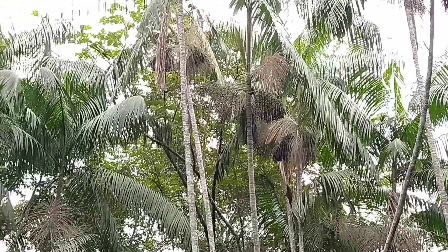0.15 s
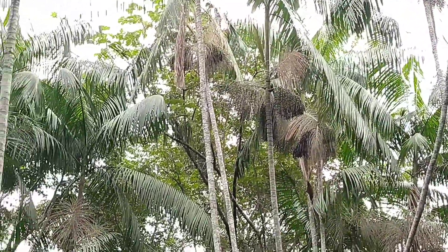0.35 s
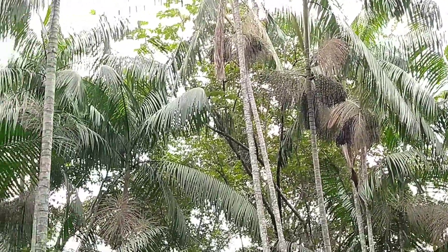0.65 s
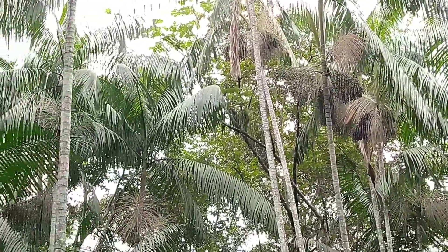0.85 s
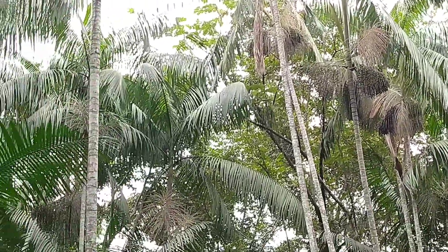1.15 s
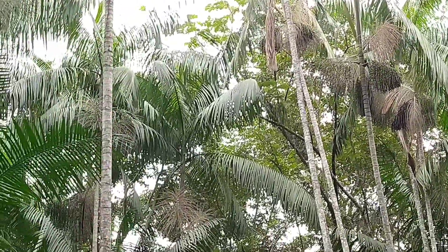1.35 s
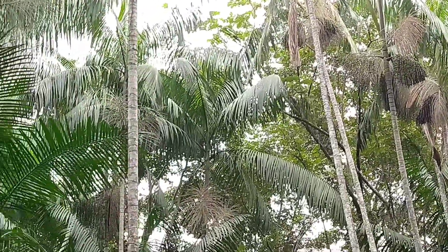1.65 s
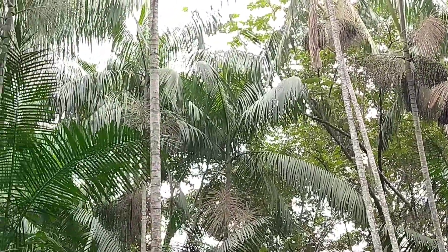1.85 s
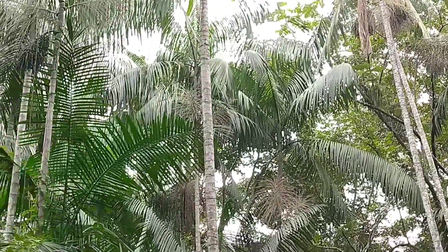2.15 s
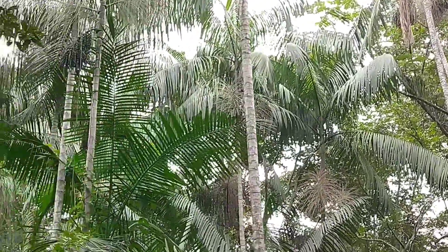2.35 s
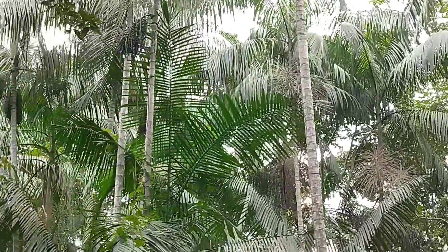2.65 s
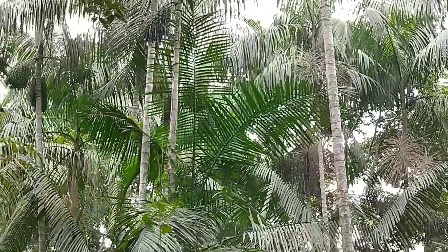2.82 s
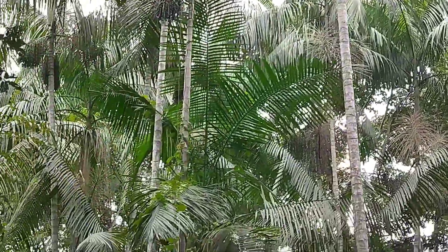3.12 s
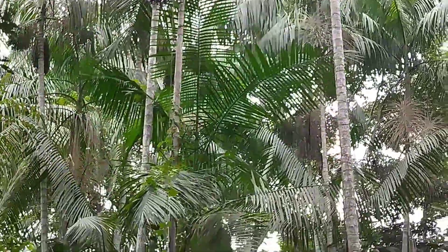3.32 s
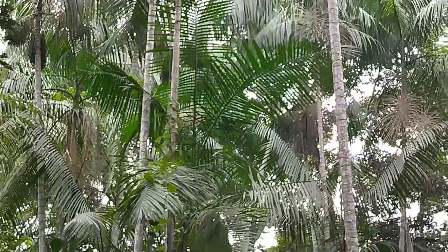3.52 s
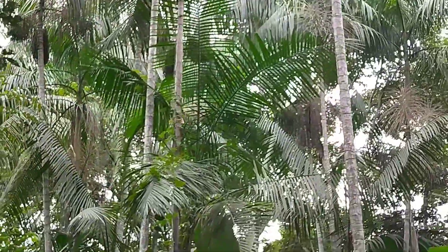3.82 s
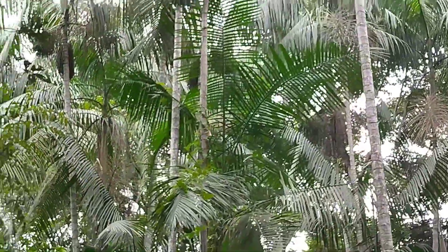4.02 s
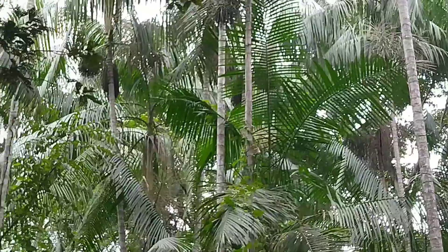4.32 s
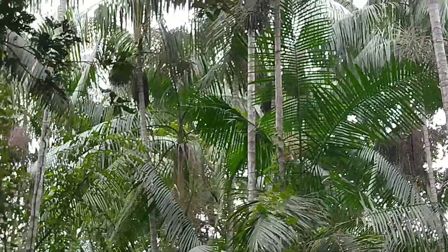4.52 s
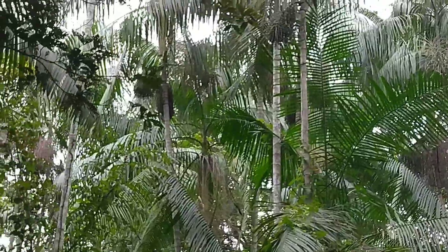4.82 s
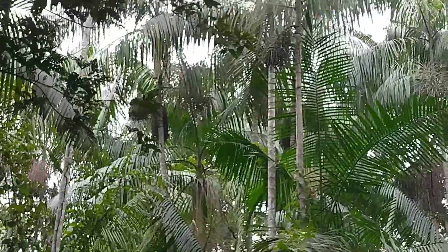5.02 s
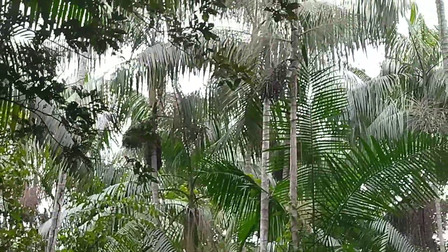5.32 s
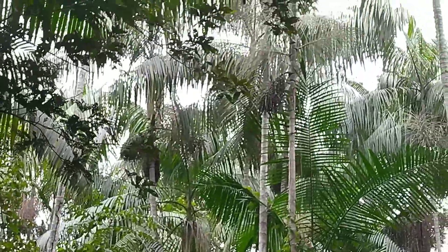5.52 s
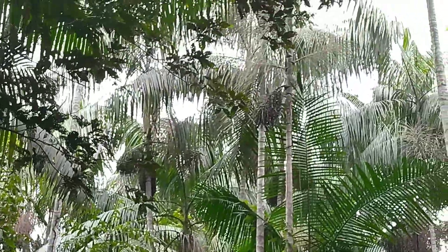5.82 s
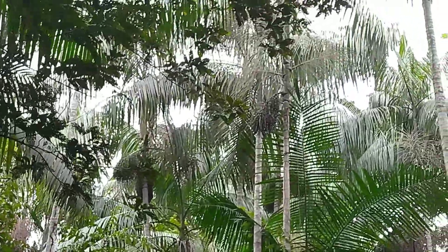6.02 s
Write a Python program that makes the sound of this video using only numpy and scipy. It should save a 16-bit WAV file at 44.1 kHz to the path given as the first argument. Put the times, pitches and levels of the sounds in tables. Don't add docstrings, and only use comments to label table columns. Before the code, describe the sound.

Outdoors among tall palms, massed insects hold a bright, unbroken, slightly flickering drone that grows gradually stronger. Behind it, faint far parrot rasps and tiny hoarse whistles scatter through the first few seconds, mostly fall silent, and return with a quick rising two-part chirp, repeated more softly. Short reflections from trunks blur the notes. Low air rumble and water murmur stay faint; the small microphone's two sides sound differently coloured.

```python
import sys
import numpy as np
from scipy import signal
from scipy.fft import rfft, irfft, dct, next_fast_len
from scipy.io import wavfile

SR = 44100
rng = np.random.default_rng(int(sys.argv[2]) if len(sys.argv) > 2 else 0)


def volts_from_decibels(level):
    exponent = np.asarray(level, float) / 20
    return 10 ** exponent


def master_out(mix):
    frames = np.transpose(np.atleast_2d(mix))
    ceiling = np.clip(frames, -1, 1)
    pcm = np.round(ceiling * 32767).astype(np.int16)
    wavfile.write(sys.argv[1], SR, pcm)


N = 271656


def rms_one(x):
    return x / np.sqrt(np.mean(x ** 2) + 1e-20)


def in_time(rows):
    t_s, level_db = np.transpose(rows)
    return np.interp(np.arange(N) / SR, t_s, level_db)


def at_hz(points, hz):
    point_hz, value = np.transpose(points)
    return np.interp(np.log(hz + 1), np.log(point_hz), value)


def drift(rate_hz):
    r = np.exp(-2 * np.pi * rate_hz * 40 / SR)
    slow = signal.lfilter([1], [1, -2 * r, r * r], rng.standard_normal(N // 40 + 2002))
    slow = rms_one(slow[2000:])
    return np.interp(np.arange(N) / 40, np.arange(len(slow)), slow)


def resonate(x, hz, width_hz):
    r = np.exp(-np.pi * width_hz / SR)
    gain = (1 - r * r) / 2
    section = [gain, 0, -gain, 1, -2 * r * np.cos(2 * np.pi * hz / SR), r * r]
    return signal.sosfilt([section, section], x)


def voices(modes, drive, patchy_db):
    out = np.zeros((2, N))
    for hz, width_hz, left_db, right_db in modes:
        left_waver = drift(2.9) + drift(42)
        right_waver = drift(4.4) + drift(16.0)
        waver = volts_from_decibels(patchy_db * np.array([left_waver, right_waver]))
        port_gain = volts_from_decibels(np.array([[left_db], [right_db]]))
        out += port_gain * waver * resonate(drive(), hz, width_hz)
    return rms_one(out)


def pulsed(hz, jitter, sharpness):
    phase = 2 * np.pi * np.cumsum(hz * (1 + jitter * drift(22))) / SR
    return rng.standard_normal((2, N)) * np.exp(sharpness * np.cos(phase))


def tymbal_clicks(per_s):
    return rng.standard_normal((2, N)) * (rng.random((2, N)) < per_s / SR)


def cicadas():
    # f/Hz, width/Hz, left/dB, right/dB
    low_modes = [(3190, 700, -9, -13.5), (3603, 840, -2.5, -4), (4797, 1600, -1.5, 0.5),
                 (5690, 1870, -6, -6), (6895, 1970, -9, 0.5), (8890, 2200, -22.5, -4)]
    high_modes = [(9250, 2100, 0, 5.5), (10320, 2300, -5.5, -4), (11150, 2400, 7, -5),
                  (12240, 4500, -11.5, -9), (14260, 1800, -13.5, -8)]
    near_modes = [(12600, 1500, -3, -12), (13600, 800, -8, -14)]
    # t/s, level/dB
    low_effort = [(0.0, -36), (0.24, -37), (1.08, -35), (1.55, -34.2), (2.43, -36), (2.5, -34),
                  (4.25, -34.5), (4.89, -32.5), (5.0, -33), (6.16, -32)]
    # t/s, level/dB
    high_effort = [(0.0, -41.5), (1.08, -39.5), (2.25, -38.7), (2.47, -42), (2.76, -37.5), (4.08, -37.5),
                   (4.19, -39.5), (4.89, -38), (5.2, -39.5), (6.16, -35.5)]
    # t/s, lift/dB
    swells = [
        (1.59, 6.5),
        (3.72, 4.5),
        (6.07, 3),
    ]
    rise_s, fall_s = 0.27, 0.09

    t = np.arange(N) / SR
    low_db = in_time(low_effort)
    high_db = in_time(high_effort)
    for crest_s, lift_db in swells:
        high_db = high_db + lift_db * np.interp(t, [crest_s - rise_s, crest_s, crest_s + fall_s], [0, 1, 0])

    clicks = lambda: tymbal_clicks(per_s=22000)
    buzz = lambda: pulsed(154.5, jitter=0.004, sharpness=1.2)
    low = voices(low_modes, clicks, patchy_db=0.64)
    high = voices(high_modes, clicks, patchy_db=0.54)
    near = voices(near_modes, buzz, patchy_db=0.8)
    chorus = volts_from_decibels(low_db + 4) * low + volts_from_decibels(high_db + 4) * (high + volts_from_decibels(-12) * near)
    edge = signal.butter(6, 3084, "high", fs=SR, output="sos")
    return signal.sosfilt(edge, chorus)


def sung_twice(rows):
    # t/s, lift/dB, tempo stretch
    starts = [
        (4.589, -5, 1.0),
        (4.924, -6, 0.98),
    ]
    return [(start_s + stretch * s, *rest, db + lift_db)
            for start_s, lift_db, stretch in starts for s, *rest, db in rows]


def bursts(rows):
    rise_db_per_s, fall_db_per_s = 482, 232
    t = np.arange(N) / SR
    gain = np.zeros(N)
    for s, hold_s, level_db in rows:
        before_s = np.maximum(s - t, 0)
        after_s = np.maximum(t - s - hold_s, 0)
        gain += volts_from_decibels(level_db - rise_db_per_s * before_s - fall_db_per_s * after_s)
    return gain


def rasps():
    # f/Hz, width/Hz, left/dB, right/dB
    flock_throat = [(1500, 690, -3.5, -7.5), (2000, 610, -3.5, 1.5), (2410, 770, 0, 3)]
    upper_throat = [(2054, 170, -1, 4), (2260, 130, 6, 1), (2890, 420, 4, 4.5)]
    lower_throat = [(1520, 520, 0, 0.0046)]
    # t/s, hold/s, level/dB
    flock_rasps = [(0.0, 0.047, -53.5), (.14, .03, -55), (.35, 0.012, -54.5), (.44, .13, -58.5),
                   (.68, .05, -53), (.86, 0.17, -55), (1.1, 0.066, -52), (1.25, .1, -53.5),
                   (1.42, 0.082, -50.5), (1.63, 0.11, -53.5), (2.16, 0.11, -61)]
    upper_rasps = [(2.462, 0.0092, -52.5), (2.525, 0.008, -50), (2.59, 0.18, -52), (3.98, 0.24, -62.5),
                   (4.297, 0.012, -54.5), (4.492, 0.085, -50.5), (4.622, .015, -43.5), (4.798, 0.026, -46),
                   (4.867, 0.032, -50), (4.974, .04, -49), (5.155, 0.14, -52)]
    lower_rasps = [
        (2.41, 0.0089, -60),
        (2.536, 0.011, -52),
        (2.737, .01, -64),
        (4.016, .03, -61),
        (4.767, 0.0078, -55.5),
        (4.87, .01, -56),
        (5.12, 0.15, -60),
    ]
    # t after start/s, hold/s, level/dB
    phrase_rasps = [
        (.012, .006, -44),
        (.066, .008, -44),
    ]

    rough = lambda: pulsed(310, jitter=0.12, sharpness=1.0)
    layers = [(flock_throat, flock_rasps, 2.5),
              (upper_throat, upper_rasps, 2.5),
              (lower_throat, [*lower_rasps, *sung_twice(phrase_rasps)], -2.5)]
    out = np.zeros((2, N))
    for throat, calls, trim_db in layers:
        out += volts_from_decibels(trim_db) * bursts(calls) * voices(throat, rough, patchy_db=3.5)
    return out


def pipes():
    # t/s, length/s, f/Hz, level/dB
    single_pipes = [
        (.16, 0.028, 1530, -71),
        (.47, .03, 1500, -59.5),
        (.555, 0.027, 1580, -60.5),
        (.865, 0.015, 1640, -59),
        (1.25, .033, 1520, -75),
        (1.315, 0.018, 1500, -61),
        (2.426, 0.031, 1450, -60.5),
        (2.505, 0.06, 1176, -76),
        (2.535, .025, 1560, -61),
        (2.735, 0.02, 1535, -63.5),
    ]
    # t/s, length/s, f of first partial/Hz, level/dB
    single_squeaks = [(2.435, .025, 1420, -75), (2.455, 0.031, 1143, -65), (2.485, 0.021, 1463, -61),
                      (2.505, 0.042, 1160, -76), (2.64, 0.089, 1075, -76), (2.68, 0.065, 1480, -70.5),
                      (4.47, 0.12, 1100, -79), (4.565, 0.03, 973, -75), (4.62, 0.02, 1270, -71),
                      (4.69, 0.039, 1178, -74), (4.895, 0.021, 993, -68), (4.98, 0.017, 1080, -79),
                      (5.025, 0.049, 1162, -74), (5.2, 0.084, 1139, -75), (5.26, 0.027, 1003, -76.5)]
    # t after start/s, length/s, start f/Hz, end f/Hz, level/dB
    phrase_pipes = [
        (0.0, 0.032, 1400, 1484, -54),
        (.055, 0.033, 1500, 1710, -49),
        (.1, .038, 1190, 1160, -54),
    ]
    phrase_squeaks = [
        (.075, 0.046, 1650, 1600, -73.5),
        (.135, .024, 1100, 1010, -67.5),
    ]

    steady = lambda rows: [(s, length_s, hz, hz, db) for s, length_s, hz, db in rows]
    kinds = [(steady(single_pipes) + sung_twice(phrase_pipes), 2.5),
             (steady(single_squeaks) + sung_twice(phrase_squeaks), 21.5)]
    wobble = 1 + 0.0085 * drift(36)
    hoarse = volts_from_decibels(3.8 * drift(49))
    out = np.zeros(N)
    for notes, second_db in kinds:
        for s, length_s, start_hz, end_hz, level_db in notes:
            size, at = round(length_s * SR), round(s * SR)
            hz = np.linspace(start_hz, end_hz, size) * wobble[at:at + size]
            phase = 2 * np.pi * np.cumsum(hz) / SR
            upper = np.sin(2 * phase) + volts_from_decibels(-6) * np.sin(3 * phase)
            tone = np.sin(phase) + volts_from_decibels(second_db) * upper
            out[at:at + size] += volts_from_decibels(level_db + 11) * tone * np.hanning(size) ** 0.6
    return out * hoarse


def trunks(x):
    t60_s, gap_s = 0.31, 0.004
    t = np.arange(SR // 2) / SR
    tail = rng.standard_normal((2, len(t))) * volts_from_decibels(-60 * t / t60_s) * (t > gap_s)
    tail /= np.sqrt(np.sum(tail ** 2, axis=1, keepdims=True))
    return signal.fftconvolve(x[None], tail, axes=1)[:, :N]


def air():
    # f/Hz, level/dB per Hz
    murmur_spectrum = [(15, -29), (25, -1.5), (32, -2.5), (84, -2), (122, -14), (164, -10), (216, -10.5),
                       (262, -9.5), (404, -14.5), (542, -11), (646, -15.5), (1280, -15), (2180, -9.5),
                       (2700, -5.5), (3510, -43.5), (5940, -120)]
    # f/Hz, correlation/1
    likeness = [(60, 0.32), (150, 0.19), (380, 0.52), (950, 0.39), (2380, -0.17), (5980, -0.018),
                (15000, -0.01)]
    size = next_fast_len(N)
    hz = np.arange(size // 2 + 1) * SR / size
    mid, side = rfft(rng.standard_normal((2, size))) * volts_from_decibels(at_hz(murmur_spectrum, hz))
    alike = np.clip(at_hz(likeness, hz), -1, 1)
    both = np.sqrt(1 + alike) * mid + np.sqrt(1 - alike) * side * [[1], [-1]]
    murmur = rms_one(irfft(both, size)[:, :N])
    rumble = signal.sosfilt(signal.butter(2, 140, fs=SR, output="sos"), murmur)
    lumps = volts_from_decibels(2.0 * drift(2.7) - 1.0)
    return volts_from_decibels(-58.5) * (murmur + (lumps - 1) * rumble)


def frame_rounded(x):
    # f/Hz, step/dB
    step_spectrum = [(6300, -60), (7000, -29), (8200, -27.5), (9400, -29), (9800, -50), (10600, -50),
                     (10800, -30), (12000, -28), (13300, -28.5), (13900, -26.5), (14600, -29.5),
                     (15400, -27)]
    # f/Hz, added left and taken right/dB
    port_offset = [(7000, 2), (8200, 3.5), (9400, 0), (10800, -3), (12000, -3.5), (13300, -1), (14000, 0)]
    m, frame_start, scatter_db, band = 1024, 962, 2.2, 32

    lead = 2 * m - frame_start
    count = (N + lead) // m + 2
    blocks = np.pad(x, ((0, 0), (lead, count * m - N - lead))).reshape(2, count, m)
    window = np.sin(np.pi * (np.arange(2 * m) + 0.5) / (2 * m))
    lapped = np.concatenate([blocks[:, :-1], blocks[:, 1:]], axis=2) * window
    a, b, c, d = np.split(lapped, 4, axis=2)
    folded = np.concatenate([-c[..., ::-1] - d, a - b[..., ::-1]], axis=2)
    lines = dct(folded, 4, norm="ortho")

    loud = np.sqrt(np.mean(lines ** 2, axis=(0, 2)))[:, None] + 1e-9
    hz = np.arange(m) * SR / (2 * m)
    step_db = at_hz(step_spectrum, hz) + np.outer([1, -1], at_hz(port_offset, hz))
    quiet_limit = volts_from_decibels(step_db)[:, None] * loud / np.median(loud)
    chance = rng.standard_normal((2, count - 1, m // band)) + 0.6 * rng.standard_normal((count - 1, 1))
    step = quiet_limit * volts_from_decibels(scatter_db * np.repeat(chance, band, axis=2))
    rounded = np.sign(lines) * np.floor(np.abs(lines) / step + 0.4) * step

    late, early = np.split(dct(rounded, 4, norm="ortho"), 2, axis=2)
    frames = np.concatenate([early, -early[..., ::-1], -late[..., ::-1], -late], axis=2) * window
    joined = frames[:, 1:, :m] + frames[:, :-1, m:]
    return joined.reshape(2, -1)[:, lead - m:lead - m + N]


def scene():
    notes = pipes()
    direct = np.array([notes, volts_from_decibels(-4) * np.roll(notes, 12)])
    return cicadas() + rasps() + direct + volts_from_decibels(-4) * trunks(notes) + air()


def top_cut(x):
    return signal.sosfilt(signal.butter(12, 15630, fs=SR, output="sos"), x)


def record(dry):
    thinned = frame_rounded(dry)
    return top_cut(thinned)


dry = scene()
out = record(dry)
master_out(out)
```